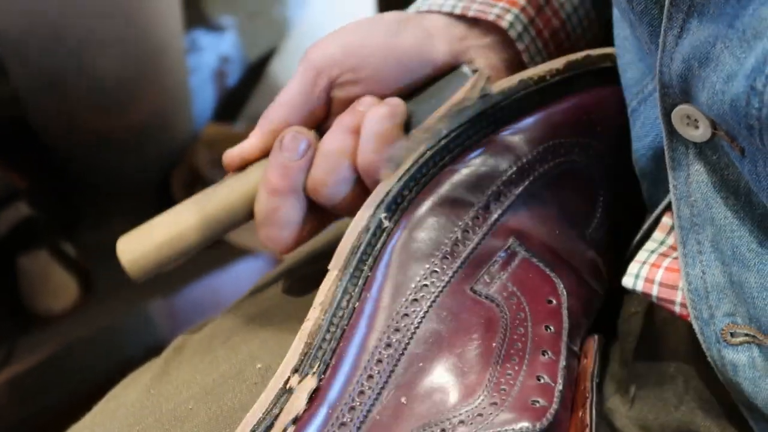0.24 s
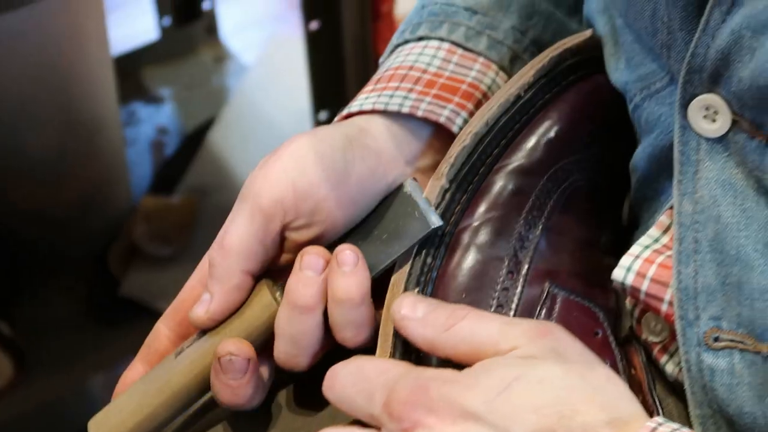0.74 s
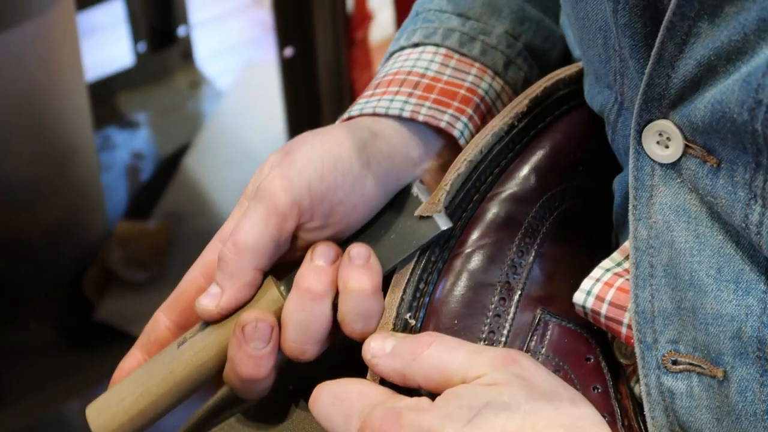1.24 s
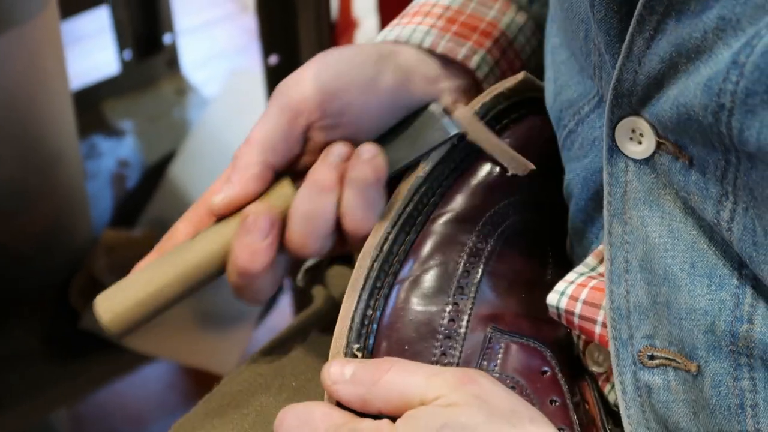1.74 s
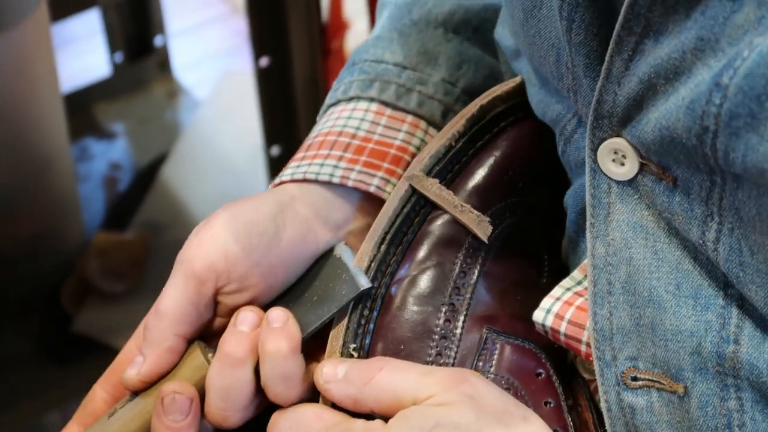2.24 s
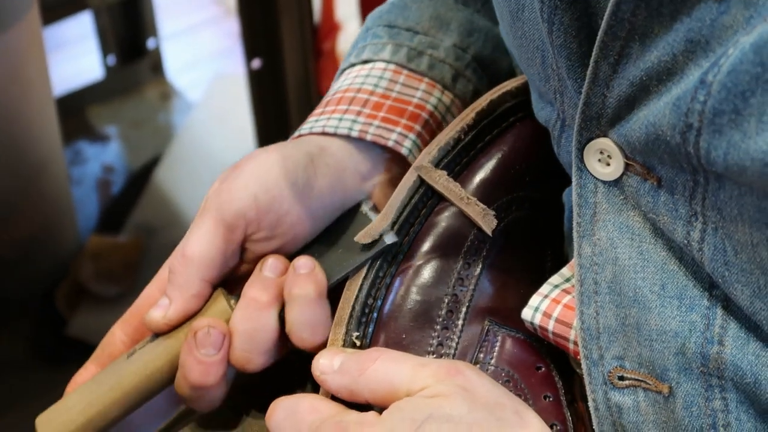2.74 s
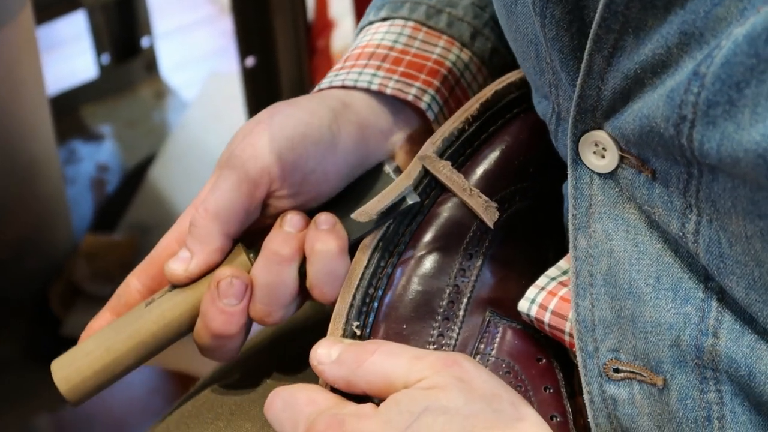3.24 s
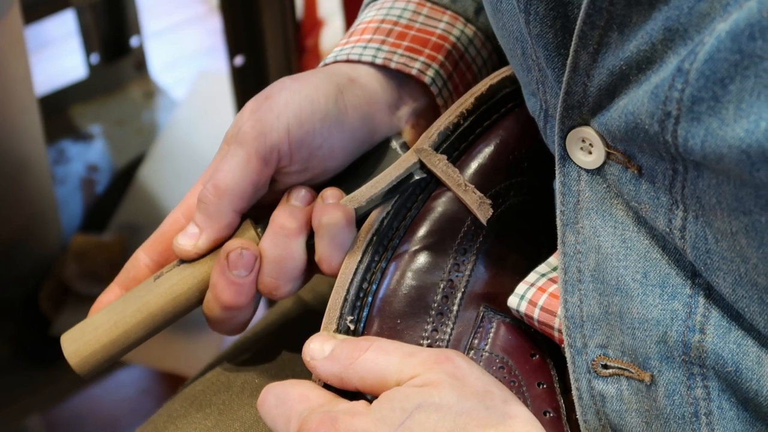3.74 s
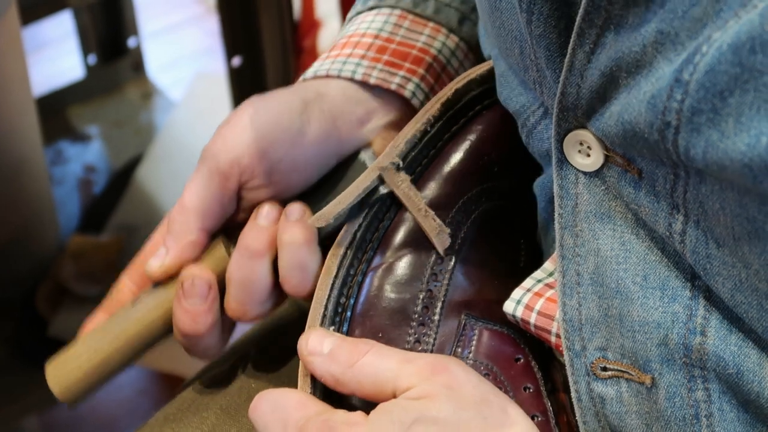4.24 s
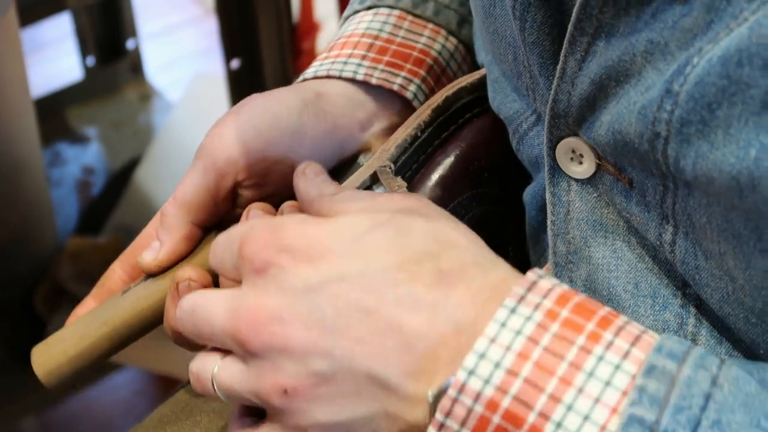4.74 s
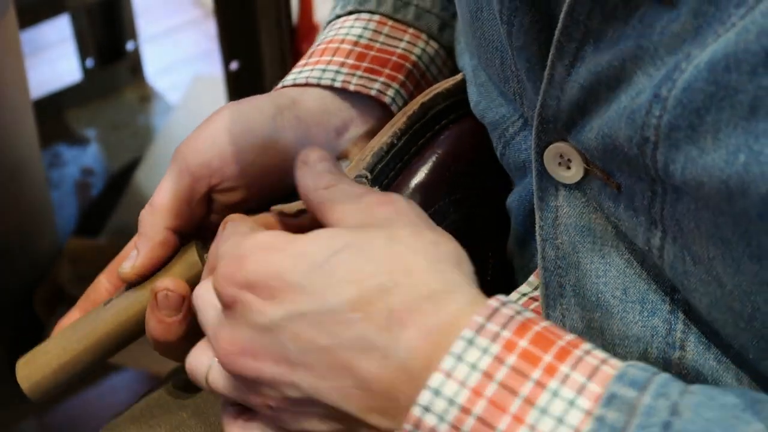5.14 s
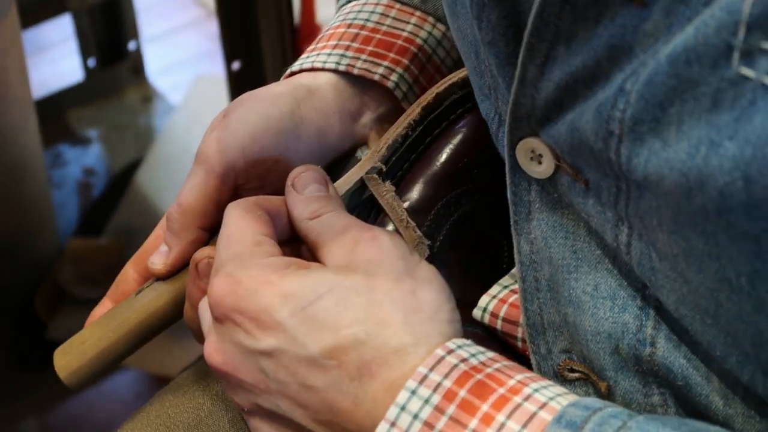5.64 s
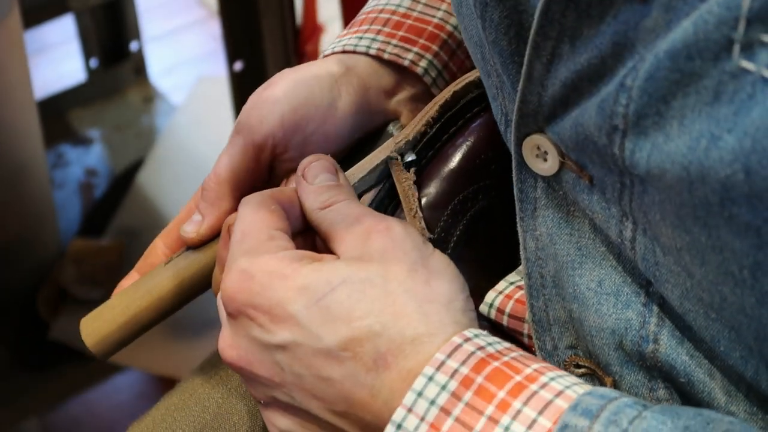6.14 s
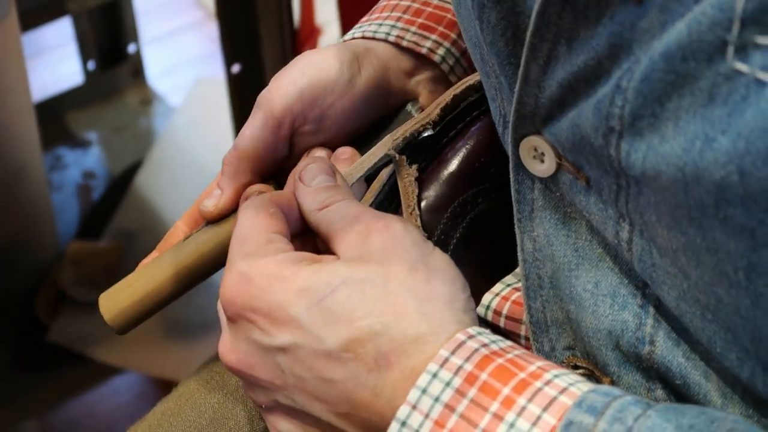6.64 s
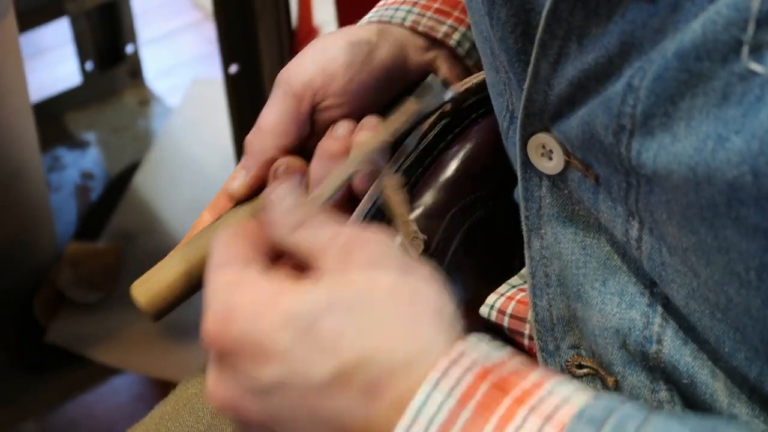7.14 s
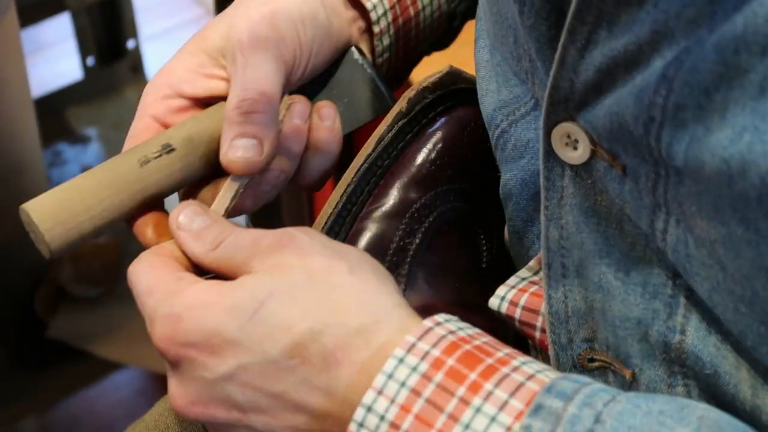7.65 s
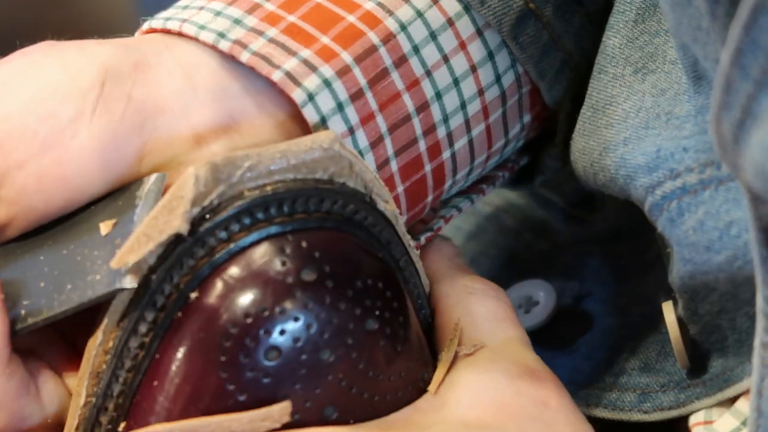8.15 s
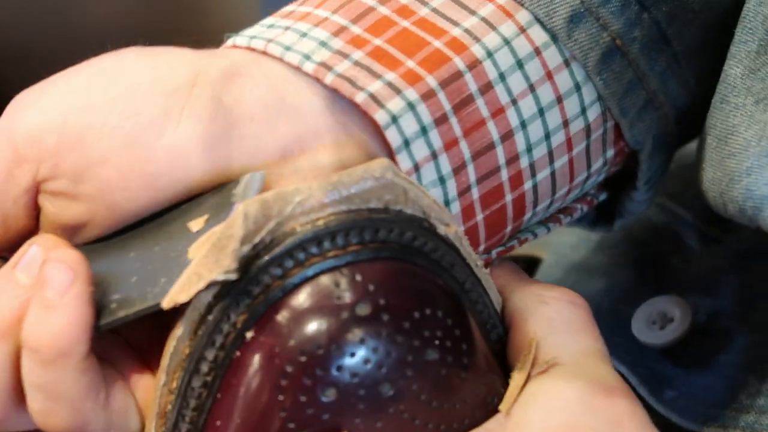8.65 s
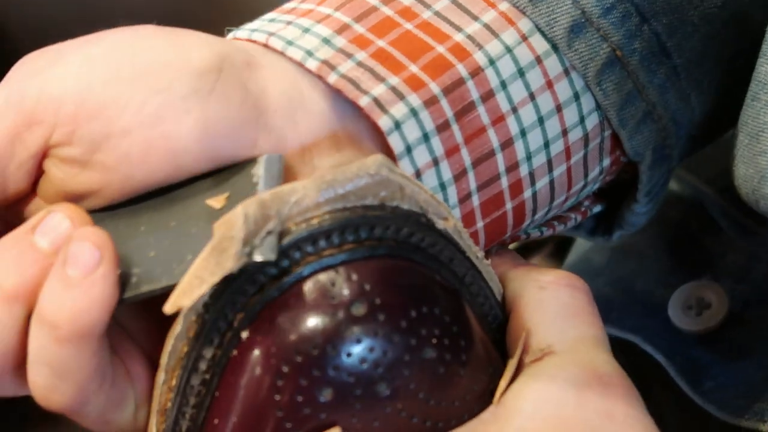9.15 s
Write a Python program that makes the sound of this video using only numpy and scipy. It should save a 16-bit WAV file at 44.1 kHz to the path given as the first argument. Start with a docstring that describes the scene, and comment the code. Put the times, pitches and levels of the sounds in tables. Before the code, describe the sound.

A blade sticks and slips through tough leather, giving dry gritty rasps, small snaps and woody knocks from the hollow shoe. Strokes come in uneven bursts with quiet handling and leather creaks between; some swell quickly and break off as the blade runs out. One distant clack echoes in the small lively room. Low ventilation hum continues throughout, and a steady low drone joins near the end. Close stereo microphone.

```python
"""A flat knife trims the edge of a leather sole, the shoe in the cobbler's lap, close to the microphone.
The blade sticks and slips: pulses ring the hollow shoe while bursts of clicks make the rasp of parting fibres.
It snaps through hard spots, squeaks now and then, and swells with a fizz as it runs out of some cuts.
Leather creaks, the blade slides and the shoe bumps in the lap; something clacks further off.
Behind it a small workshop hums: shaped noise, wavering tones and, late on, a steady low drone."""
import sys
import numpy as np
from scipy import signal
from scipy.fft import rfft, irfft
from scipy.io import wavfile
from scipy.ndimage import uniform_filter1d

SR = 44100
rng = np.random.default_rng(int(sys.argv[2]) if len(sys.argv) > 2 else 0)


def output_pcm(signal):
    """Save a mono or channel-first signal as 16-bit PCM at the path in sys.argv[1].

    Samples are clipped to [-1, 1] before scaling.
    """
    pcm = np.clip(np.atleast_2d(signal).T, -1, 1) * 32767
    wavfile.write(sys.argv[1], SR, np.round(pcm).astype(np.int16))


N = 413658
TIME = np.arange(N) / SR  # seconds
TAPS = 4096  # length of short sounds and filters, in samples
TAP_TIME = np.arange(TAPS) / SR  # seconds
HZ = np.fft.rfftfreq(TAPS, 1 / SR)


def gain_of(db):
    """Turns decibels into amplitude."""
    return 10 ** (np.asarray(db) / 20)


def evened(x):
    """Scales a sound to an average (rms) level of 1."""
    return x / np.sqrt(np.mean(x ** 2) + 1e-20)


def steadied(x, seconds):
    """Holds the rms near 1 over spans of this length and keeps the finer grain."""
    span = max(int(seconds * SR), 8)
    power = abs(uniform_filter1d(x ** 2, span))
    return x / np.sqrt(power + 1e-9)


def read(points, hz):
    """Joins (Hz, value) points by straight lines on a log-frequency axis."""
    f, value = np.transpose(points)
    return np.interp(np.log(hz + 1), np.log(f + 1), value)


def add(mix, s, sound):
    """Mixes a sound in at time s."""
    part = mix[max(round(s * SR), 0):][:len(sound)]
    part += sound[:len(part)]


def response(db):
    """Builds an impulse response with this gain over HZ, starting at once and scaled to energy 1."""
    both_halves = np.concatenate([db, db[-2:0:-1]])
    log_gain = np.log(gain_of(both_halves))
    ring = np.fft.ifft(np.exp(np.conj(signal.hilbert(log_gain)))).real
    return ring / np.linalg.norm(ring)


def through(x, ring):
    """Passes sound through an impulse response."""
    return signal.oaconvolve(x, ring)[:len(x)]


def narrow_noise(hz, width_hz, size):
    """A tone that wavers in level and phase, rms 1, because it is noise in a narrow band."""
    f = np.fft.rfftfreq(size, 1 / SR)
    noise = rfft(rng.standard_normal(size))
    return evened(irfft(noise / (1 + (2 * (f - hz) / width_hz) ** 2), size))


def clicks(per_s, spread_db):
    """Randomly timed clicks, mostly small and a few large."""
    size = gain_of(spread_db * np.minimum(rng.exponential(1, N), 4))
    return size * rng.choice([-1, 1], N) * (rng.random(N) < per_s / SR)


# How long each grip on the shoe lasts: (from_s, to_s)
FIRST_GRIP, SIDE_GRIP, TIGHT_SIDE_GRIP, STRIP_GRIP, TOE_GRIP = (0, .43), (.43, 2.2), (2.2, 4.5), (4.5, 7.7), (7.7, 9.4)
# The top of the rasp, stronger or weaker with the angle of the blade
SHEEN_HZ, SHEEN_WIDTH_HZ = 10960, 9300
# Stouter fibres part with ticks of their own
CRACKLE_PER_S, CRACKLE_SPREAD_DB = 130, 2.2
# Ringing tones of the hollow shoe under each grip: pitch_hz [Hz], width_hz [Hz], relative_level_db [dB]
SHOE_FIRST = [(345.5, 45, -0.5), (407.4, 50.3, 0.5), (615, 157, -15.5), (794, 73, -11.5)]
SHOE_SIDE = [(215, 79, -18), (336.84, 22.3, 0), (399.3, 56.9, -5.5), (521, 136, -15), (778, 135, -20)]
SHOE_STRIP = [(248, 95, -8), (345, 60, 1), (415, 70, 0.5), (579.8, 80, -1), (804, 140, -10)]
SHOE_TOE = [(189.4, 55, -5), (419.4, 36, 1.5), (498.5, 68, 1), (608, 127, -7.5), (860, 230, -16.5)]
# Resonances of blade and sole edge under each grip: pitch_hz [Hz], width_hz [Hz], lift_db [dB]
EDGE_FIRST = [(1120, 250, 5.5), (1740, 190, 7), (2090, 220, 9), (3240, 270, 4), (4174, 300, 9.5),
              (11500, 2300, 1)]
EDGE_SIDE = [(1369.5, 110, 9.5), (1900, 220, 3.5), (2230, 340, 8.5), (2785, 130, 7), (3410, 600, 3.5),
             (4127, 180, 7), (4860, 350, 3.6), (5800, 380, 2.6)]
EDGE_STRIP = [(1400, 150, -6), (1630, 280, 6.5), (2110, 400, 8.3), (3080, 350, 3.8), (4260, 200, 7.5),
              (5300, 600, 2), (6700, 600, 1), (8110, 900, 5), (12300, 1100, 6.5)]
EDGE_TOE = [(1170, 130, 4.5), (1676, 210, 4.5), (1980, 380, 7.5), (2440, 220, 6.5), (3100, 260, 4.5),
            (3620, 380, 4.5), (4220, 330, 4.5), (5700, 400, 2), (11660, 2200, 2.76)]
# Tone colour of parting fibres: pitch_hz [Hz], relative_level_db [dB]
FIBRES = [(200, -25.5), (600, 1), (1000, 0.5), (2000, -2.5), (3300, -5), (5000, -11), (8000, -14.5),
          (10000, -15.5), (12500, -17), (14500, -22), (16000, -39.5)]
# Tone colour of leather tearing at full speed: pitch_hz [Hz], relative_level_db [dB]
FIZZ = [(400, -16), (780, 9), (1300, 2), (2200, 4), (3300, -3), (5000, -7.5), (9000, -8.5), (12500, -0.5),
        (16000, -11)]


def cut(hand, grip, modes, edge, slips_per_s, fibres_per_s, grain_db, clump, catch_db, push_db,
        sheen_db, fizz_db, crackle_db, crack_db, thump_db, tear_s):
    """Each slip knocks the shoe and parts a clump of fibres; a harder push slips faster, a fast blade fizzes."""
    start, end = grip
    edge = edge + [(SHEEN_HZ, SHEEN_WIDTH_HZ, sheen_db)]
    push, rasp, fast = hand * ((TIME >= start) & (TIME < end))
    slips = slip_train(slips_per_s * np.clip(push / push.max(), .03, 1) ** .45)
    shoe = shoe_ring(modes)
    # the stronger the rasp, the less the blade catches
    bite = catches(per_s=48, depth_db=catch_db) ** np.clip(1 - rasp / rasp.max(), 0, 1)
    knocks = steadied(through(slips * bite, shoe), seconds=0.03316)
    # fibres crowd together just after each slip
    parting = evened(through(abs(slips), np.exp(-TAP_TIME / 0.0032)))
    grains = clicks(fibres_per_s, grain_db) * (1 + clump * parting)
    fibres = bite * steadied(grains, seconds=0.0182)
    rasp_ring = edge_ring(FIBRES, edge)
    rasping = through(fibres * rasp, rasp_ring)
    fizz = through(rng.standard_normal(N) * fast ** 2 / rasp.max(), edge_ring(FIZZ, edge))
    ticks = evened(clicks(CRACKLE_PER_S, CRACKLE_SPREAD_DB))
    crackle = through(ticks * np.maximum(rasp - fast, 0), rasp_ring)
    scrape = gain_of(push_db) * push * knocks + rasping
    scrape = scrape + gain_of(fizz_db) * fizz + gain_of(crackle_db) * crackle
    return shifting(scrape) + snaps(start, end, shoe, edge, crack_db, thump_db, tear_s)


def slip_train(per_s, jitter=.55, spread_db=2.5):
    """Stick and slip: pulses of uneven size at uneven intervals, following a changing rate."""
    gap, size = rng.standard_normal((2, 12000))
    at = np.searchsorted(np.cumsum(per_s) / SR, np.cumsum(np.exp(jitter * gap)))
    pulses = gain_of(spread_db * size) * rng.choice([-1, 1], len(at))
    return np.bincount(at[at < N], pulses[at < N], N)


def catches(per_s, depth_db, release_s=0.0081):
    """Uneven leather: the edge catches, bites harder at once, and eases off."""
    jolts = abs(slip_train(np.full(N, per_s), spread_db=8.0))
    bite = through(jolts, np.exp(-TAP_TIME / release_s))
    swing = np.minimum(evened(bite - bite.mean()), 2.2)
    return steadied(gain_of(depth_db * swing), seconds=0.0578)


def shoe_ring(modes, low_hz=170, high_hz=1000):
    """The hollow shoe: a few broad modes that radiate little bass and, being leather, little treble."""
    power = sum(gain_of(db) ** 2 / (1 + (2 * (HZ - hz) / width) ** 2) for hz, width, db in modes)
    power = power / (1 + (low_hz / (HZ + 1)) ** 4)
    power = power / (1 + (HZ / high_hz) ** 4)
    return response(10 * np.log10(power + 1e-10))


def edge_ring(spectrum, modes):
    """A spectrum lifted at the resonances of blade and sole edge."""
    lift_db = sum(db / (1 + (2 * (HZ - hz) / width) ** 2) for hz, width, db in modes)
    return response(read(spectrum, HZ) + lift_db)


def shifting(x, depth_db=2.4, above_hz=900):
    """As the contact point travels along the sole, the small upper resonances come and go."""
    hz, t, z = signal.stft(x, SR, nperseg=512, noverlap=384)
    patches = uniform_filter1d(rng.standard_normal(z.shape), size=4, axis=0)
    patches = evened(uniform_filter1d(patches, size=16, axis=1))
    gain = gain_of(depth_db * patches * (hz / np.hypot(hz, above_hz))[:, None])
    gain /= np.sqrt(np.mean(gain ** 2, axis=1, keepdims=True))
    return signal.istft(z * gain, SR, nperseg=512, noverlap=384)[1][:N]


# The blade jumps through a hard spot; each grip shifts both levels:
# start_s [s], crack_level_db [dB before the shift], thump_level_db [dB before the shift]
SNAPS = [(.033, -42, -36), (.0504, -40, -33), (.2304, -25.5, -29), (0.2395, -21, -33.5), (.4625, -35, -40),
         (.591, -40, -54), (1.1396, -40, -32.5), (1.3039, -35.5, -29.5), (1.3765, -27.5, -34),
         (1.7377, -29.5, -28.5), (1.7481, -33, -27.5), (2.4542, -41.5, -38), (2.5365, -36, -34),
         (2.554, -38, -36), (2.568, -38, -31), (2.647, -37, -33), (2.6683, -37, -30), (2.807, -40, -37),
         (2.8723, -26, -37.5), (2.9073, -38, -30), (3.109, -26.5, -30), (3.1902, -29.5, -37.5),
         (3.2256, -24.5, -29), (3.3989, -27, -34), (3.478, -32.5, -40), (3.5016, -29, -33),
         (3.6103, -24, -33), (3.716, -24.5, -31), (3.8214, -27, -31), (4.1938, -36.5, -51),
         (4.3375, -51, -37.5), (4.6058, -36, -39), (5.119, -42, -50), (5.1498, -39, -42), (5.595, -43, -48),
         (5.67, -44, -50), (5.7524, -40, -45), (6.407, -40, -41), (6.492, -40, -42), (6.7955, -32, -39),
         (6.8383, -28.5, -39), (7.035, -38, -43), (7.144, -39, -46), (7.2907, -27, -26.5),
         (7.9314, -47, -39), (8.3155, -40, -47), (8.4315, -35, -40), (8.449, -35.5, -42),
         (8.5287, -32, -37.5), (8.981, -42, -46), (9.035, -44, -44), (9.1212, -41, -38), (9.1694, -40, -39),
         (9.2065, -37, -35), (9.2442, -33, -40), (9.2925, -34, -39), (9.305, -38, -33),
         (9.3256, -37, -33.5), (9.3714, -37, -43)]
# Tone colour of a snap: pitch_hz [Hz], relative_level_db [dB]
CRACK = [(200, -11.5), (700, 0.5), (2000, 6.5), (3500, -1), (5500, -1), (7500, -8.5), (9000, -7),
         (12500, -6), (16000, -19.5)]


def snaps(start, end, shoe, edge, crack_db, thump_db, tear_s, swing_s=0.00322, clop_db=-8.5, clop_s=0.00924):
    """A bundle of fibres tears within milliseconds, the stiff sole clops, and the shoe swings after it."""
    out = np.zeros(N)
    tick = edge_ring(CRACK, edge)
    sole_modes = [(635, 79, 0.5), (820, 156, 2.5), (944, 65, -6), (1385, 72, -4)]
    sole = shoe_ring(sole_modes, low_hz=458, high_hz=1620)
    swing = shoe * (1 - np.exp(-TAP_TIME / swing_s))
    for s, crack, thump in SNAPS:
        grit, grain = rng.standard_normal((2, TAPS))
        if start <= s < end:
            hard = np.clip((crack - thump + 4) / 8, 0, 1)  # soft spots give way more slowly
            burst = through(grit * np.exp(-TAP_TIME / (tear_s * (2 - hard))), tick)
            clop = through(grain * np.exp(-TAP_TIME / clop_s), sole)
            snap = burst / abs(burst).max() + gain_of(clop_db) * clop / abs(clop).max()
            add(out, s, gain_of(crack + crack_db) * snap)
            add(out, s, gain_of(thump + thump_db) * swing / abs(swing).max())
    return out


# Cracks from spots that do not hold the blade at all, and that stall it fully
SOFT_SPOT_DB, HARD_SPOT_DB = -47, -28


def sticking(stall_db=8, stall_s=.03, surge_db=2.5, surge_s=.04):
    """The blade slows to a stall before each snap and lurches on after it; the harder the spot, the more."""
    db = np.zeros(N)
    stall = -stall_db * np.exp(-np.square(TAP_TIME / stall_s) ** 2)[::-1]
    surge = surge_db * np.exp(-TAP_TIME / surge_s)
    shape = np.concatenate([stall, surge])
    for s, crack, _ in SNAPS:
        hold = np.interp(crack, [SOFT_SPOT_DB, HARD_SPOT_DB], [0, 1])
        add(db, s - TAPS / SR, hold * shape)
    return gain_of(db)


# One short curve for each slow cut, before sticking and the grip's own settings:
# time_s [s], push_on_shoe_db [dB], rasp_of_edge_db [dB]
OPENING_CUT = [(0.0, -42, -55), (0.116, -34, -54), (0.17, -35.5, -58.5)]
FIRM_CUT = [(0.78, -52.0, -59.5), (0.98, -46.5, -57), (1.09, -45.5, -58.5), (1.16, -34.5, -53),
            (1.34, -38.5, -46.5), (1.42, -30, -45.5), (1.5, -30.5, -41.5), (1.61, -36.5, -49.5),
            (1.69, -36, -50.5)]
JERKY_CUT = [(2.32, -52.5, -70.5), (2.37, -44, -57.5), (2.5, -42.5, -55), (2.641, -39, -47.5),
             (2.82, -40.5, -51.5), (2.86, -48, -55), (2.9, -37, -47), (3.05, -42.5, -50),
             (3.28, -40.0, -49.5), (3.379, -48, -50.5), (3.56, -50, -57), (3.6, -46, -52),
             (3.66, -46, -54.5), (3.92, -48.5, -52.5), (4.22, -54.5, -59)]
PEELING_CUT = [(5.965, -46, -59.5), (6.019, -46.5, -52), (6.11, -48, -50.5), (6.17, -54.5, -57.5),
               (6.26, -52, -54), (6.33, -53.5, -58.5), (6.41, -51, -52), (6.46, -54, -57.5),
               (6.51, -48.5, -53.5), (6.719, -47.5, -53.5), (6.77, -55, -58), (6.83, -52, -57),
               (6.86, -43.5, -50), (6.99, -48, -53.5), (7.02, -53, -58), (7.07, -47, -56), (7.12, -53, -62),
               (7.17, -53, -60), (7.2, -42, -53), (7.24, -42, -53)]
LAST_CUT = [(9.0, -50, -57.5), (9.046, -51, -61), (9.38, -39.5, -50.5)]
# The blade gathers speed and runs out of the leather: exit_s [s], swell_db_per_s [dB/s],
# push_at_exit_db [dB], rasp_at_exit_db [dB], shoe_thud_db [dB]
RUN_OUTS = [(0.244, 115, -31.5, -34.7, -51), (1.751, 188.5, -31.5, -37.5, -36.5),
            (7.289, 269, -30.5, -36, -36.5), (8.526, 110, -34.5, -41.3, -47)]
# Hands shift shoe and knife between cuts: start_s [s], length_s [s], push_db [dB], rasp_db [dB]
NUDGES = [(.265, .03, -44, -54), (.35, 0.043, -49, -58.5), (.46, 0.269, -49, -57),
          (4.076, 0.039, -45, -62.5), (4.31, 0.0725, -47, -66.5), (4.563, 0.1352, -49, -57),
          (4.71, 0.1194, -45, -58), (5.08, .09, -57, -68), (5.27, 0.092, -55, -60.5),
          (5.419, .09, -52, -66.5), (5.591, 0.0732, -53, -67.5), (7.917, 0.161, -54, -64)]


def handwork():
    """Push on the shoe, rasp of the edge, and the part of that rasp made at full speed."""
    slow = sum(slow_cut(rows) for rows in (OPENING_CUT, FIRM_CUT, JERKY_CUT, PEELING_CUT, LAST_CUT))
    fast = sum(run_out(*row) for *row, _ in RUN_OUTS)
    shifts = sum(nudge(*row) for row in NUDGES)
    push, rasp = np.hypot(fast, sticking() * np.hypot(slow, shifts))
    return np.array([push, rasp, fast[1]])


# How fast a cut sets in and dies away
BITE_DB_PER_S, EASE_DB_PER_S = 349, 254


def slow_cut(rows):
    """Push and rasp of one slow cut: the edge bites, follows the hand, and eases off."""
    s, push, rasp = np.transpose(rows)
    fade_db = BITE_DB_PER_S * np.maximum(s[0] - TIME, 0) + EASE_DB_PER_S * np.maximum(TIME - s[-1], 0)
    curves_db = np.array([np.interp(TIME, s, push), np.interp(TIME, s, rasp)])
    return gain_of(curves_db - fade_db)


# The sound collapses at the exit; a soft follow-through remains
EXIT_S, FOLLOW_DB, FOLLOW_S = .012, -13, .065


def run_out(s, swell_db_per_s, push_db, rasp_db):
    """Push and rasp swell as the blade speeds up, then collapse when it leaves the leather."""
    after, follow = np.maximum(TIME - s, 0), gain_of(FOLLOW_DB)
    release = (1 - follow) * np.exp(-after / EXIT_S) + follow * np.exp(-after / FOLLOW_S)
    swell = gain_of(swell_db_per_s * np.minimum(TIME - s, 0))
    return gain_of([[push_db], [rasp_db]]) * swell * release


NUDGE_ATTACK_S, NUDGE_SAG_DB_PER_S, NUDGE_RELEASE_S = .006, 25, .022


def nudge(s, length, push_db, rasp_db):
    """Push and rasp of a small shift of the hands: a quick start, a sagging hold, a short release."""
    t, shape = np.arange(SR // 2) / SR, np.zeros(N)
    hold = np.minimum(t / NUDGE_ATTACK_S, 1) * gain_of(-NUDGE_SAG_DB_PER_S * t)
    add(shape, s, hold * np.exp(-np.maximum(t - length, 0) / NUDGE_RELEASE_S))
    return gain_of([[push_db], [rasp_db]]) * shape


# The blade squeals against the leather: start_s [s], length_s [s], pitch_hz [Hz],
# level_db [dB before the judder], roughness [bandwidth divided by pitch]
SQUEAKS = [(0.966, 0.0539, 2684, -48.5, 0.021), (3.028, 0.0286, 5950, -58.5, 0.14),
           (3.061, 0.0193, 5780, -47, 0.08), (3.15, 0.0344, 5750, -49, 0.13),
           (3.94, 0.0461, 3330, -49.5, 0.157), (3.981, 0.0353, 3290, -51, 0.15),
           (4.037, 0.0315, 3030, -52.5, 0.14)]


def squeaks(judders_per_s=130, judder_db=3):
    """Brief squeals of steel on leather, some pure and some rough, broken up as the blade judders."""
    out = np.zeros(N)
    for s, length, hz, db, rough in SQUEAKS:
        window = signal.windows.tukey(int(length * SR), .5)
        squeal = steadied(narrow_noise(hz, rough * hz, size=4096), seconds=0.0094)
        add(out, s, gain_of(db) * window * squeal[:len(window)])
    return out * catches(per_s=judders_per_s, depth_db=judder_db)


def lurches(hz=250, width_hz=100, rise_s=0.0158, settle_s=.024):
    """The shoe rocks in the lap with a low thud that peaks as the blade exits and frees it."""
    level = 0
    for s, *_, thud_db in RUN_OUTS:
        level = level + gain_of(thud_db) * np.exp(np.minimum((TIME - s) / rise_s, (s - TIME) / settle_s))
    return level * steadied(narrow_noise(hz, width_hz, N), seconds=0.03)


# The leather creaks as it is gripped and pulled; each knock varies around these values:
# start_s [s], length_s [s], middle_pitch_hz [Hz], middle_level_db [dB]
CREAKS = [(.515, .03, 600, -46), (.67, .03, 560, -45), (4.563, .018, 410, -43), (4.772, .05, 520, -41),
          (5.275, .06, 560, -41), (5.346, .022, 550, -39), (5.424, .005, 580, -36.5),
          (5.437, .085, 510, -41), (5.597, .08, 440, -38.5), (5.76, .012, 450, -40), (5.96, .04, 390, -39),
          (8.375, .05, 650, -46)]


def creaks(slips_per_s=90, jitter=.3, spread_db=2.2, breakaway_db=4, width_hz=170, wander=.08):
    """Strained leather gives in a slow string of knocks, the first mostly strongest, each pitched differently."""
    out = np.zeros(N)
    for s, length, hz, db in CREAKS:
        gap, size, bend = rng.standard_normal((3, 32))
        at = np.append(0, np.cumsum(np.exp(jitter * gap))) / slips_per_s
        slip_dbs = np.append(breakaway_db, spread_db * size)
        pitches = hz * np.exp(wander * bend)
        for t, slip_db, pitch in zip(at[at < length], slip_dbs, pitches):
            knock = shoe_ring([(pitch, width_hz, 0)], low_hz=310, high_hz=850)
            add(out, s + t, gain_of(db + slip_db) * knock / abs(knock).max())
    return out


# The flat of the blade slides along the cut: start_s [s], length_s [s], level_db [dB before the catches]
SLIDES = [(.48, .24, -65), (3.86, .38, -63), (5.98, .18, -65), (6.85, .22, -58)]
# Tone colour of that slide: pitch_hz [Hz], relative_level_db [dB]
SLIDE = [(1000, -30), (3500, -12), (6000, -1), (9000, 0), (13000, -2), (16000, -9)]


def slides(grains_per_s=3500, grain_db=3, catch_db=2.5, taper=.6):
    """The flat of the blade slides along the fresh cut with a fine, bright, uneven rasp."""
    level = np.zeros(N)
    for s, length, db in SLIDES:
        add(level, s, gain_of(db) * signal.windows.tukey(int(length * SR), taper))
    grains = evened(clicks(grains_per_s, grain_db)) * catches(per_s=40, depth_db=catch_db)
    return through(level * grains, edge_ring(SLIDE, EDGE_STRIP))


# The shoe is settled in the lap: middle_s [s], half_length_s [s], pitch_hz [Hz], level_db [dB]
BUMPS = [(7.914, .016, 26, -47), (7.948, .012, 70, -43), (8.11, .016, 210, -46), (8.39, .02, 175, -46)]


def bumps():
    """Soft low bumps, each a short swell of one tone, as the shoe is settled in a new grip."""
    out = np.zeros(N)
    for s, width, hz, db in BUMPS:
        swell = np.exp(-((TIME - s) / width) ** 2)
        out += gain_of(db) * swell * np.cos(2 * np.pi * hz * (TIME - s))
    return out


def near_scatter(x, level_db=-1.5, above_hz=7500, decay_s=0.002):
    """Hands and shoe scatter the treble so that it reaches left and right equally loud but out of step."""
    noise = rng.standard_normal(TAPS) * np.exp(-TAP_TIME / decay_s)
    scatter = 1j * evened(rfft(noise).imag)
    ring = np.roll(irfft(scatter * HZ / np.hypot(HZ, above_hz)), TAPS // 4)
    side = signal.oaconvolve(x, ring)[TAPS // 4:][:N]
    return gain_of(level_db) * side * np.array([[1], [-1]])


# The echo of the room: pitch_hz [Hz], time_to_fall_60_db_s [s]
ROOM_T60 = [(150, 0.02), (500, 0.72), (2500, 0.59), (6000, 0.24), (14000, 0.25)]
# and pitch_hz [Hz], echo_level_db [dB]
ROOM_DB = [(150, -11.5), (400, -18), (800, -8.5), (2500, -10.5), (5000, -6.5), (13000, -8.5)]


def room(x, first_s=0.0062, build_s=0.0062):
    """Dense reflections, different at each ear, each band dying at its own speed."""
    hz, t, z = signal.stft(rng.standard_normal((2, SR // 2)), SR, nperseg=256)
    t60 = read(ROOM_T60, hz)[:, None]
    decay = np.exp(-np.log(1000) * t / t60) * np.sqrt(2 * np.log(1000) / (t60 * SR))
    tail = signal.istft(z * decay * gain_of(read(ROOM_DB, hz))[:, None], SR, nperseg=256)[1]
    tail = tail * np.clip((np.arange(tail.shape[1]) / SR - first_s) / build_s, 0, 1)
    return signal.oaconvolve(x[None], tail, axes=1)[:, :N]


CLACK_S = 1.8445
# Tone colour of something that clacks further off in the shop: pitch_hz [Hz], relative_level_db [dB]
CLACK = [(120, -10), (224, 3.5), (450, -7), (800, -6.5), (1060, -8), (1440, -10.5), (1900, -8), (2900, -8),
         (3900, -14), (4600, -23), (6000, -29), (12300, -31.5), (15000, -59.5)]


def clack(level_db=-32, decay_s=0.0235):
    """A short dry clack: a fading noise burst in the tone colour above."""
    out = np.zeros(N)
    burst = rng.standard_normal(TAPS) * np.exp(-TAP_TIME / decay_s)
    add(out, CLACK_S, gain_of(level_db) * through(burst, response(read(CLACK, HZ))))
    return out


AIR_DB = -50.5  # overall level
# Tone colour of the shop's air: pitch_hz [Hz], relative_level_db [dB per Hz]
AIR = [(10, -28), (22, -9), (43, -4.5), (115, -2.5), (160, -1), (230, -4), (340, -3), (480, -8.5),
       (950, -14.5), (2000, -20), (4000, -24), (6500, -30), (10000, -36), (15000, -44)]
# How alike left and right are: pitch_hz [Hz], likeness [0 unrelated, 1 the same]
AIR_SAME = [(30, 0.856), (80, 0.973), (150, 0.632), (300, 0.364), (1000, 0.206), (12000, 0.095)]
# Steady machine hum and a thin electrical whine: pitch_hz [Hz], level_db [dB], width_hz [Hz]
HUM = [(59.68, -64, 2.4), (92.64, -65.5, 3.94), (13007, -79, 3.9)]


def shop_air():
    """Diffuse ventilation noise with the hum of a machine in it."""
    hz = np.fft.rfftfreq(N, 1 / SR)
    a, b = rfft(rng.standard_normal((2, N)))
    same = np.clip(read(AIR_SAME, hz), -1, 1)
    both_ears = np.array([a, same * a + np.sqrt(1 - same ** 2) * b])
    air = irfft(both_ears * gain_of(read(AIR, hz)), N)
    hum = sum(gain_of(db) * steadied(narrow_noise(f, width, N), seconds=0.072) for f, db, width in HUM)
    return gain_of(AIR_DB) * evened(air) + hum


def motor(start_s=8.88, rise_s=0.167, hz=149.9, level_db=-52.5):
    """A steady low drone, one pure tone, sets in somewhere in the shop."""
    rise = np.clip((TIME - start_s) / rise_s, 0, 1)
    return gain_of(level_db) * rise * np.sqrt(2) * np.sin(2 * np.pi * hz * TIME)


def scene():
    """The knife close by, the clack further off, and the shop around them."""
    hand = handwork()
    knife = squeaks() + lurches() + creaks() + slides()
    knife += cut(hand, FIRST_GRIP, SHOE_FIRST, EDGE_FIRST, slips_per_s=700, fibres_per_s=8900,
                 grain_db=2.5, clump=0.29, catch_db=1.36, push_db=0.5, sheen_db=1.5, fizz_db=-6,
                 crackle_db=-11, crack_db=-3, thump_db=4.5, tear_s=0.0032)
    knife += cut(hand, SIDE_GRIP, SHOE_SIDE, EDGE_SIDE, slips_per_s=800, fibres_per_s=7000,
                 grain_db=2.0, clump=0.344, catch_db=2, push_db=-1.3, sheen_db=0.7, fizz_db=-5.5,
                 crackle_db=-10, crack_db=-4, thump_db=4.0, tear_s=0.00144)
    knife += cut(hand, TIGHT_SIDE_GRIP, SHOE_SIDE, EDGE_SIDE, slips_per_s=700, fibres_per_s=5000,
                 grain_db=3.6, clump=0.45, catch_db=2.0, push_db=0.5, sheen_db=0.0, fizz_db=-12,
                 crackle_db=-8, crack_db=0.0, thump_db=3.5, tear_s=0.00185)
    knife += cut(hand, STRIP_GRIP, SHOE_STRIP, EDGE_STRIP, slips_per_s=750, fibres_per_s=8000,
                 grain_db=1.0, clump=0.49, catch_db=3.0, push_db=-0.42, sheen_db=0.5, fizz_db=-8,
                 crackle_db=-10, crack_db=-3.1, thump_db=5.5, tear_s=0.0014)
    knife += cut(hand, TOE_GRIP, SHOE_TOE, EDGE_TOE, slips_per_s=550, fibres_per_s=7000,
                 grain_db=2.5, clump=.45, catch_db=5.0, push_db=0.8, sheen_db=-1, fizz_db=-7,
                 crackle_db=-7.5, crack_db=-3, thump_db=2, tear_s=0.00516)
    close = knife + near_scatter(knife) + room(knife)
    far = clack()
    distant = far + gain_of(9.0) * room(far)  # distance favours the room's echo
    return close + distant + shop_air() + bumps() + motor()


CUTOFF_HZ = 15500


def record(dry):
    """Low-pass filter: takes away the treble above the cutoff."""
    low_pass = signal.firwin(255, CUTOFF_HZ, window=("kaiser", 8), fs=SR)
    return signal.oaconvolve(dry, low_pass[None], "same")


dry = scene()
out = record(dry)
output_pcm(out)
```